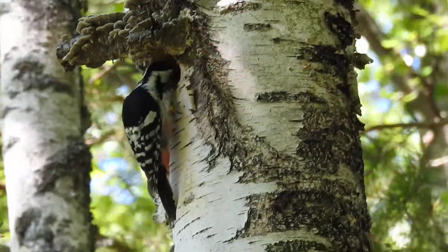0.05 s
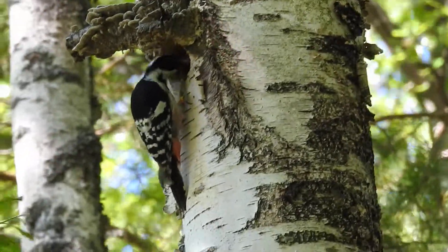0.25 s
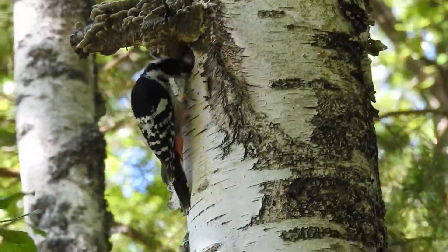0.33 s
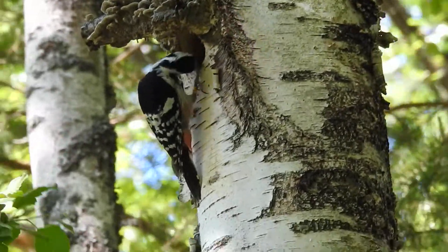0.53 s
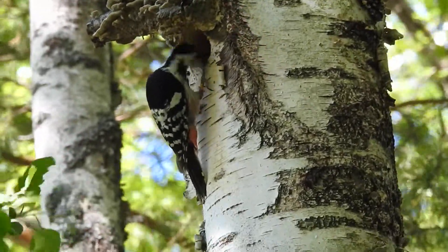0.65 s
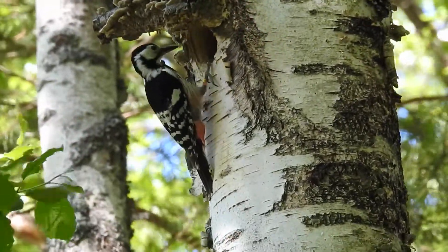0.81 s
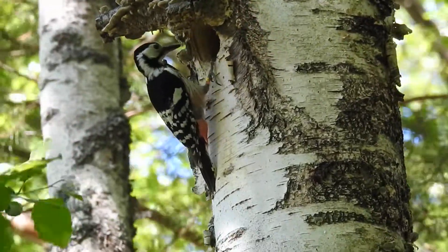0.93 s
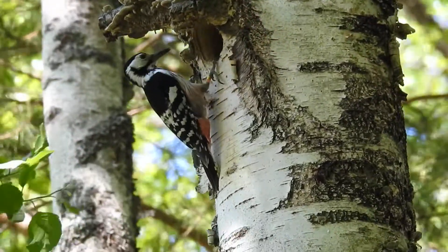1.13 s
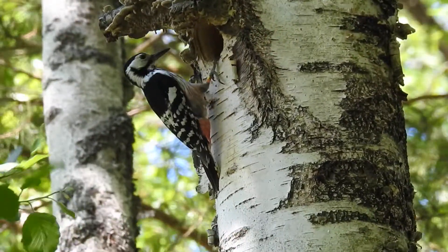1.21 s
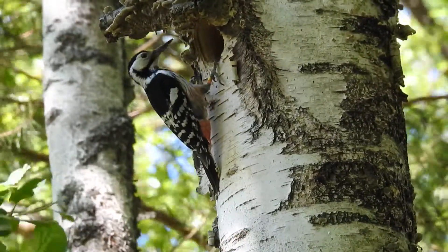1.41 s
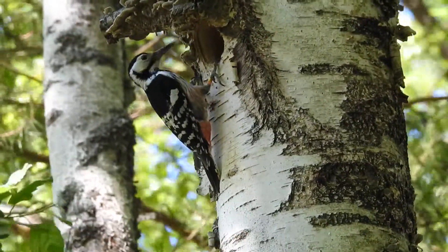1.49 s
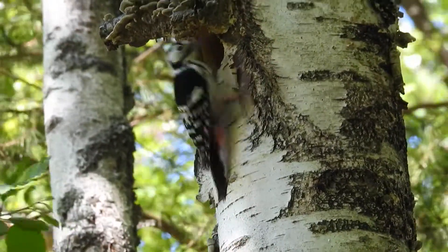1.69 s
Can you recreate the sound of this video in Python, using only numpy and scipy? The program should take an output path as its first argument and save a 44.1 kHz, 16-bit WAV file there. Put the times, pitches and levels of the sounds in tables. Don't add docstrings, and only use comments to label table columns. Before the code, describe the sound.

Raspy begging squeaks of nestling woodpeckers, with thin bird whistles over rustling leaves and low hum

```python
import sys
import numpy as np
from scipy import signal
from scipy.fft import rfft, irfft, next_fast_len
from scipy.io import wavfile
from scipy.ndimage import uniform_filter1d, map_coordinates

SR = 44100
rng = np.random.default_rng(int(sys.argv[2]) if len(sys.argv) > 2 else 0)


def store_wav(level_fs):
    pcm = np.round(np.clip(np.atleast_2d(level_fs), -1, 1) * 32767)
    wavfile.write(sys.argv[1], SR, pcm.T.astype(np.int16))


def makeup_ratio(level_db):
    decades = np.asarray(level_db, float) / 20
    return 10 ** decades


N = 77175


def unit(x):
    return x / np.sqrt(np.mean(x ** 2) + 1e-20)


def along(points, hz):
    f, v = np.transpose(points)
    return np.interp(np.log(hz + 1), np.log(f + 1), v)


def wobble(rate):
    return map_coordinates(rng.standard_normal(N // 40), [np.arange(N) * rate / SR])


def filtered(x, response):
    m = next_fast_len(N + SR // 2)
    return irfft(rfft(x, m) * response(np.fft.rfftfreq(m, 1 / SR)), m)[..., :N]


def panned(x, pan_db):
    return x * makeup_ratio(np.array([[pan_db / 2], [-pan_db / 2]]))


def voiced(rows):
    s, hz, db = np.transpose(rows)
    t = np.arange(N) / SR
    hz = np.interp(t, s, hz)
    for _ in range(2):
        hz = uniform_filter1d(hz, size=110)
    fade_s = .008
    gate = np.clip(np.minimum(t - s[0], s[-1] - t) / fade_s, 0, 1)
    return 2 * np.pi * np.cumsum(hz) / SR, gate, np.interp(t, s, db)


# time_s, pitch_hz, effort_db
CALL_1 = [(0, 1250, -46), (.01, 1390, -42), (.018, 1465, -38), (.028, 1320, -41), (.045, 1170, -48)]
CALL_2 = [(0.16, 1309, -41), (0.186, 1370, -50), (0.21, 1344, -34.5), (0.228, 1416, -34), (0.25, 1698, -30),
          (0.258, 1635, -26), (0.264, 1500, -40), (0.28, 1156, -21)]
CALL_3 = [(.41, 1340, -36), (.432, 1500, -27), (.452, 1570, -19.5), (.4705, 1590, -13), (.4745, 1890, -20),
          (.487, 1935, -16), (.497, 1860, -17.5), (.506, 1490, -22), (.52, 1110, -33)]
CALL_4 = [(.655, 1515, -46), (.687, 1570, -43), (.705, 1550, -39), (.715, 1428, -32), (.726, 1590, -31),
          (.737, 1738, -30), (.746, 1540, -33), (.765, 1150, -42)]
CALL_5 = [(.98, 1348, -52), (.994, 1391, -47), (1.006, 1583, -32.5), (1.016, 1775, -32.5),
          (1.03, 1866, -31.5), (1.042, 1773, -28), (1.05, 1490, -36), (1.06, 1175, -41)]
CALL_6 = [(1.245, 1400, -50), (1.275, 1400, -45), (1.289, 1365, -35), (1.301, 1525, -33), (1.31, 1420, -35),
          (1.325, 1130, -39)]
CALL_7 = [(1.52, 1330, -54), (1.562, 1370, -42), (1.573, 1540, -33), (1.581, 1320, -41), (1.592, 1170, -52)]
CALLER = [1, 1, 0, 1, 1, 1, 1]
# rasp_db (against peak effort), brightness_db (per octave), pan_db (left-right)
MANNER = [
    (-16, -1.5, .1),
    (-18, 1.5, 1),
    (-26.5, 0.14, 0.6),
    (-6, -2.5, 2.5),
    (-8, -4.5, 1.5),
    (-10, -3, 1),
    (-14.5, -2, 2),
]
OVERTONES = [
    [-17, -12, 0, -10, -23, -54, -43, -64, -70],
    [-30, -4, -11, 0, -15, -18, -21, -38, -42],
]
# frequency_hz, level_db
THROAT = [(1500, -40), (2500, -14), (4700, -3), (6200, 0), (8000, -13), (10500, -17), (12500, -27),
          (15000, -44)]
# frequency_hz, level_db
BEAK = [(2500, -1), (3300, -3), (4000, -11), (4600, 0), (6300, 0), (7900, -4), (9500, 0), (14000, -3)]


def chicks():
    flutter_db, breakup = 1.2, .2
    rasp_follows = .45
    hole_hz = 1750
    out = np.zeros((2, N))
    calls = [CALL_1, CALL_2, CALL_3, CALL_4, CALL_5, CALL_6, CALL_7]
    for rows, chick, (rasp_db, bright_db, pan_db) in zip(calls, CALLER, MANNER):
        phase, gate, db = voiced(rows)
        slack_db = np.clip(db.max() - db, 0, 15)
        depth_db = flutter_db + breakup * slack_db
        tone = 0
        for k, level_db in enumerate(OVERTONES[chick], start=1):
            flutter = wobble(170) + 0.52 * np.array([wobble(91), wobble(90.4)])
            tilted_db = level_db + bright_db * np.log2(k / 4)
            tone = tone + makeup_ratio(tilted_db + depth_db * flutter) * np.sin(k * phase)
        puffs = (1 + np.cos(phase)) * rng.standard_normal((2, N))
        rasp = unit(filtered(puffs, lambda f: makeup_ratio(along(THROAT, f))))
        rasp = rasp + rasp[::-1] * 1.2
        rasp = makeup_ratio(db.max() + rasp_db - rasp_follows * slack_db) * rasp
        out += panned(gate * (makeup_ratio(db) * tone + rasp), pan_db)
    return filtered(out, lambda f: makeup_ratio(along(BEAK, f)) / (1 + (hole_hz / (f + 1)) ** 12))


# frequency_hz, likeness (0 to 1)
ALIKE = [(30, 0.63), (200, .96), (1000, .94), (3000, 0.84), (8000, 0.2), (14000, 0.14)]


def rush(shape, patchy_db):
    z = signal.stft(rng.standard_normal((2, N + 512)), nperseg=512)[2]
    field = rng.standard_normal(z.shape[1:])
    field = uniform_filter1d(field, size=6, axis=0)
    field = uniform_filter1d(field, size=10, axis=1)
    pair = signal.istft(z * makeup_ratio(patchy_db * unit(field)), nperseg=512)[1][:, :N]

    def spread(hz):
        turn = np.arccos(np.clip(along(ALIKE, hz), -1, 1)) / 2
        return shape(hz) * [np.cos(turn), np.sin(turn)]

    mid, side = filtered(pair, spread)
    return unit(np.array([mid + side, mid - side]))


# frequency_hz, level_db (per Hz)
DRONE = [(15, -62), (25, -23), (59, -9), (134, -9), (192, -3), (275, -5.5), (648, -4.5), (782, -8.5),
         (1500, -11), (1950, -39), (3300, -120)]
# frequency_hz, level_db (per Hz)
LEAVES = [(880, -31), (1500, -17), (2240, -12), (3000, -8), (3870, -9), (5290, -2), (6190, -6.5),
          (8130, -25.5), (15500, -47.5)]


def forest():
    calm_db, rustle_db, gust_db = .4, 1.1, .8
    hum_hz, hum_width_hz = 189.5, 9.5
    hum = rush(lambda f: 1 / np.hypot(1, 2 * (f - hum_hz) / hum_width_hz), calm_db)
    drone = rush(lambda f: makeup_ratio(along(DRONE, f)), calm_db)
    leaves = rush(lambda f: makeup_ratio(along(LEAVES, f)), rustle_db)
    leaves = leaves * makeup_ratio(gust_db * wobble(2.54))
    return makeup_ratio(-56) * hum + makeup_ratio(-46) * drone + makeup_ratio(-38) * leaves


# time_s (from the top of the note), pitch_hz, level_db
RISING = [(-.075, 3573, 5), (-.065, 3720, -3.5), (-.03, 3944, -7), (-.013, 4250, -0.5), (-.005, 5220, 6.5),
          (0, 6260, 0), (.01, 4380, 5)]
FALLING = [(-.024, 3050, -22), (-.012, 4350, -6), (-.003, 4980, -3), (.009, 4760, 0), (.026, 4020, -12),
           (.034, 3720, -8), (.048, 3220, -11), (.057, 2930, -18)]
LOW = [(-.02, 2777, 6), (-.012, 2837, 4), (0, 3070, 4), (.014, 3180, 2), (.03, 3096, -26)]
# top_s, pitch_ratio, level_db
RISING_NOTES = [
    (.063, 1.043, -33.5),
    (.203, 1.015, -34),
    (0.35, .99, -34.5),
]
FALLING_NOTES = [
    (0.607, .905, -31),
    (0.756, 1.001, -23),
    (0.911, 0.98, -24),
    (1.07, 1.02, -23),
    (1.238, 1.001, -24),
]
LOW_NOTES = [
    (1.378, 1.06, -43),
    (1.455, 1.001, -43.5),
    (1.534, 1.01, -42.5),
    (1.612, 1.001, -40.5),
    (1.692, 0.99, -44),
]


def songbird():
    flutter_db = 1.6
    out = np.zeros(N)
    for shape, notes in [(RISING, RISING_NOTES), (FALLING, FALLING_NOTES), (LOW, LOW_NOTES)]:
        for top_s, ratio, note_db in notes:
            rows = [(top_s + dt, ratio * f, note_db + rel_db) for dt, f, rel_db in shape]
            phase, gate, level_db = voiced(rows)
            out += gate * makeup_ratio(level_db + flutter_db * wobble(130)) * np.sin(phase)
    return panned(out, -2.5)


# frequency_hz, time_s (to fall 60 dB)
TRUNKS = [(1000, 0.13), (3000, 0.31), (6000, 0.48), (9000, 0.19), (14000, 0.04)]


def trunks(x):
    sway_per_s, sway_rad = 90, 1.6
    hz, t, z = signal.stft(rng.standard_normal((3, SR)), SR, nperseg=256)
    fading = makeup_ratio(-60 * t / along(TRUNKS, hz)[:, None])
    tail = signal.istft(z * fading, SR, nperseg=256)[1]
    tail = tail[:2] + 1.36 * tail[2]
    sway = np.exp(1j * sway_rad * wobble(sway_per_s))
    blurred = np.real(signal.hilbert(x.mean(0)) * sway)
    blurred = np.pad(blurred, (200, 0))
    return signal.fftconvolve(blurred[None], tail / np.linalg.norm(tail[0]), axes=1)[:, :N]


def far_echo(beg):
    delay_s = .085
    late = np.pad(beg.mean(0), (round(delay_s * SR), 0))[:N]
    return filtered(panned(makeup_ratio(-26) * late, -6), lambda f: 1 / (1 + (f / 6500) ** 6))


# start_s, level_db
TICKS = [
    (0.873, -29),
    (1.198, -33),
]


def twigs():
    tick_hz, fall_s = 4170, 0.052
    t = np.arange(N) / SR
    env = sum(makeup_ratio(db - 60 * np.abs(t - s) / fall_s) * (t > s) for s, db in TICKS)
    band = lambda f: 1 / (1 + (np.log2(f / tick_hz + .01) / .75) ** 8)
    return filtered(env * rng.standard_normal(N), band) * 2


def scene():
    beg, song = chicks(), songbird()
    echoes = far_echo(beg) + makeup_ratio(-10.5) * trunks(beg) + makeup_ratio(-6) * trunks(song)
    return beg + song + echoes + twigs() + forest()


def low_pass(x):
    return signal.sosfilt(signal.butter(12, 15650, fs=SR, output="sos"), x)


# frequency_hz, left_minus_right_db
PORTS = [(40, -1), (300, 0.5), (2500, -1.5), (5000, -3), (8000, 5.5), (14000, -4.5)]


def record(dry):
    halves = np.array([[.5], [-.5]])
    heard = filtered(dry, lambda hz: makeup_ratio(along(PORTS, hz) * halves) * (hz < 15650))
    return low_pass(heard)


dry = scene()
out = record(dry)
store_wav(out)
```